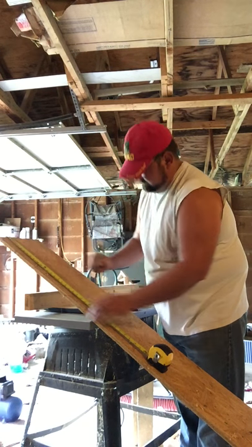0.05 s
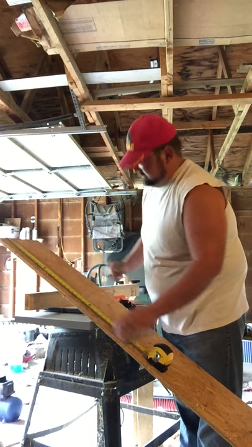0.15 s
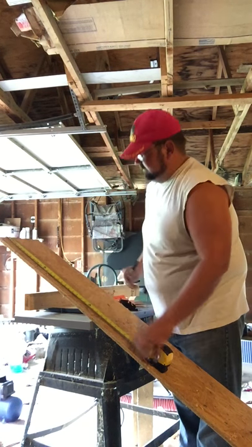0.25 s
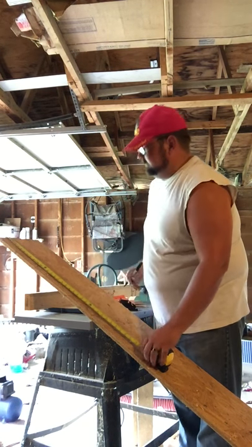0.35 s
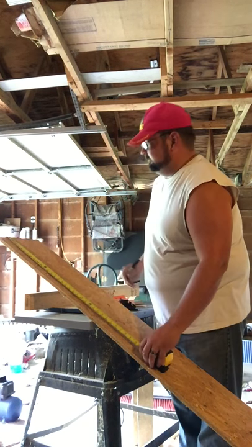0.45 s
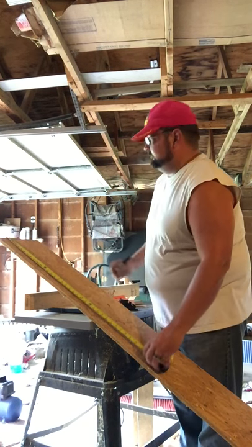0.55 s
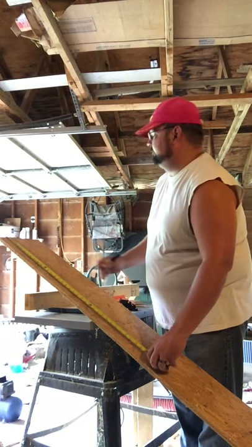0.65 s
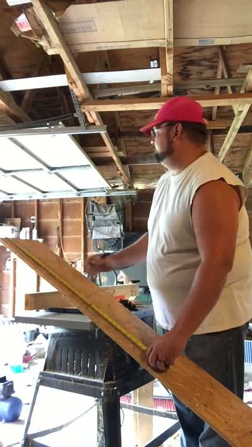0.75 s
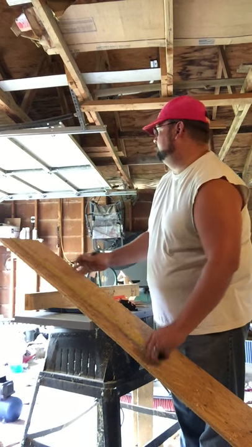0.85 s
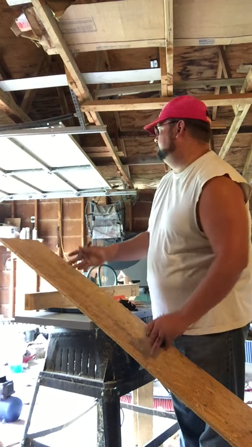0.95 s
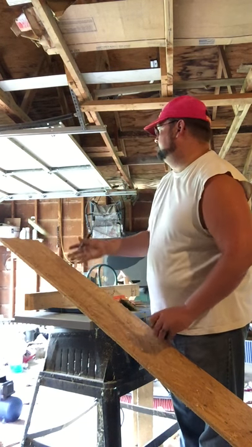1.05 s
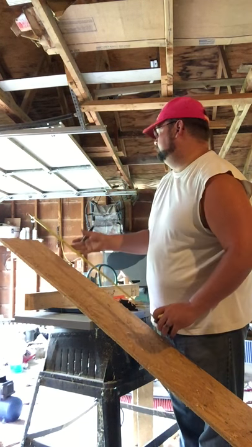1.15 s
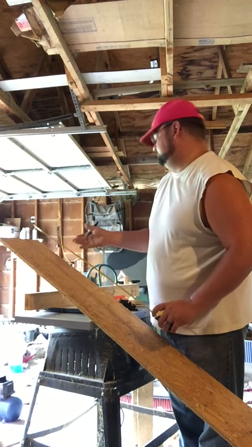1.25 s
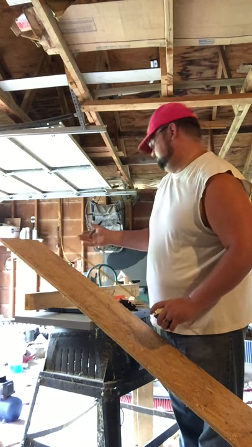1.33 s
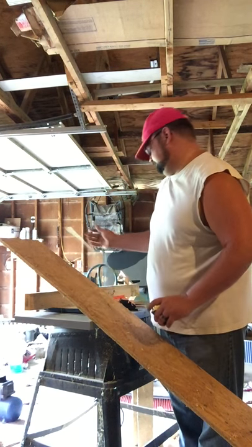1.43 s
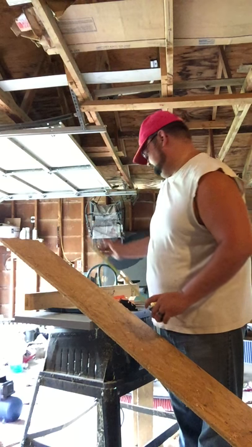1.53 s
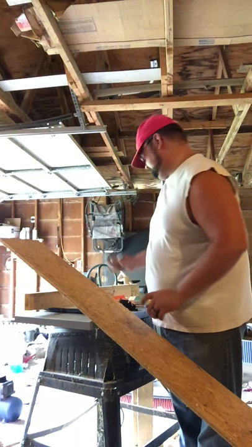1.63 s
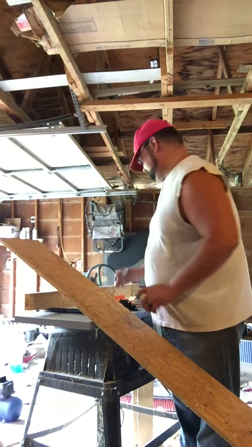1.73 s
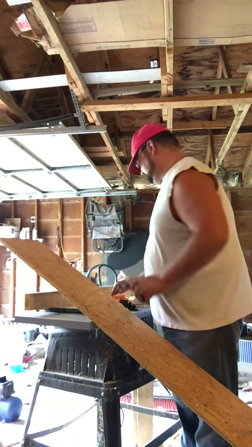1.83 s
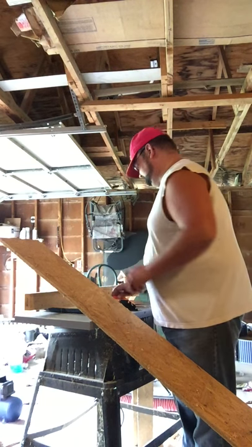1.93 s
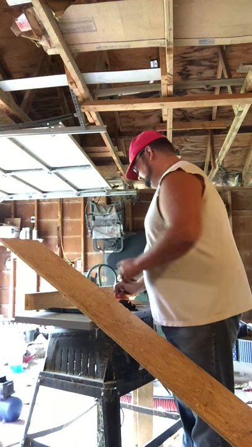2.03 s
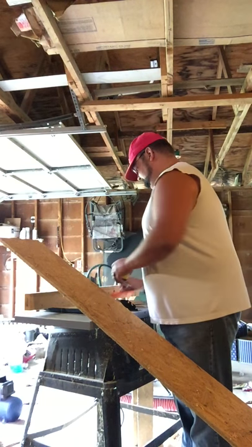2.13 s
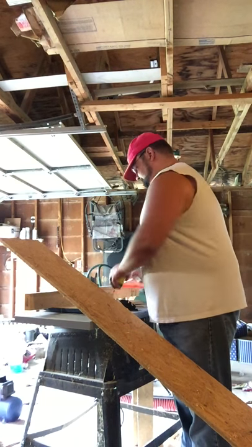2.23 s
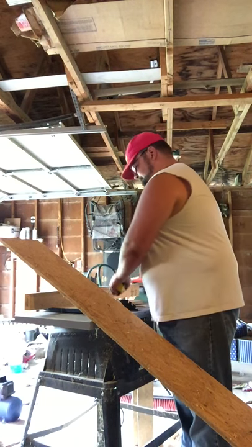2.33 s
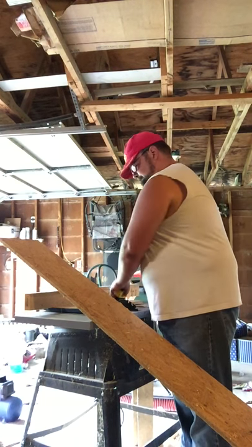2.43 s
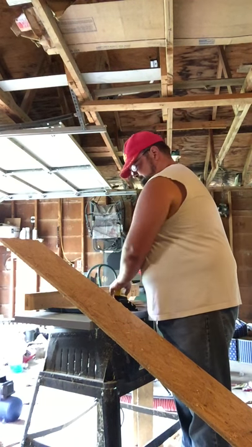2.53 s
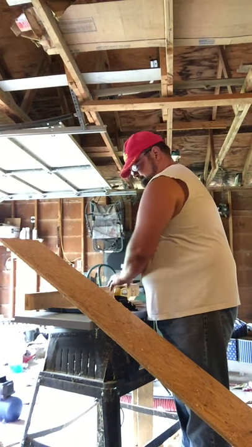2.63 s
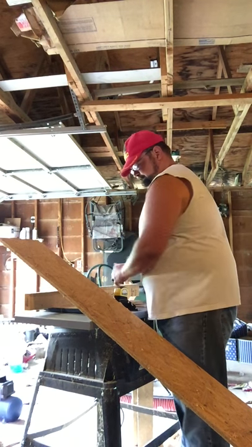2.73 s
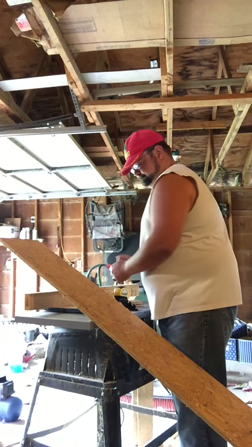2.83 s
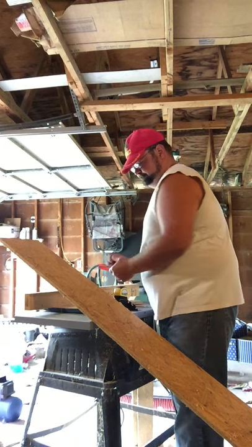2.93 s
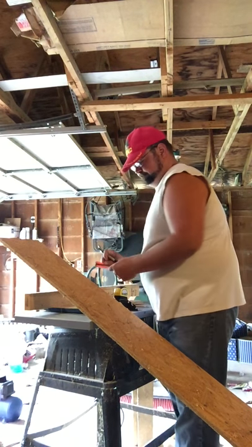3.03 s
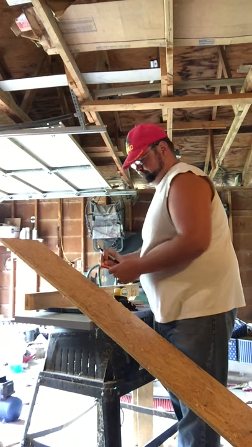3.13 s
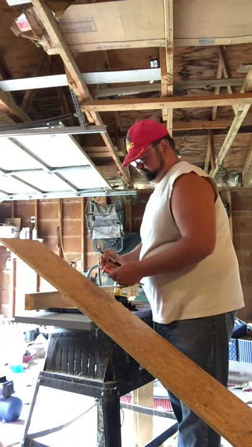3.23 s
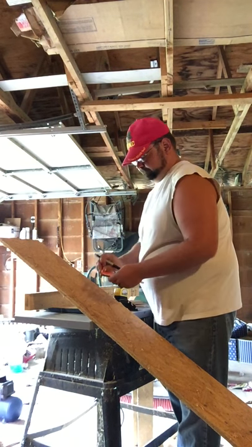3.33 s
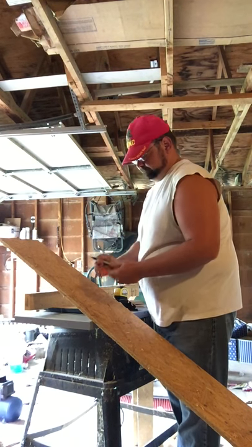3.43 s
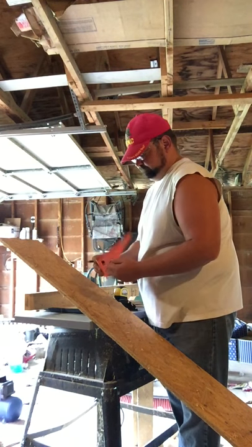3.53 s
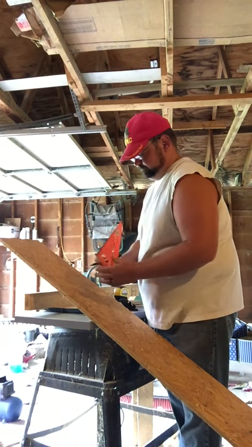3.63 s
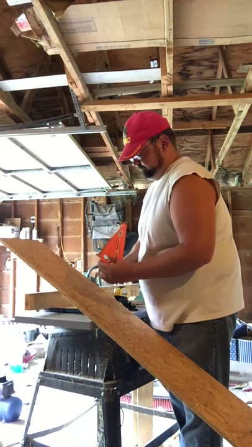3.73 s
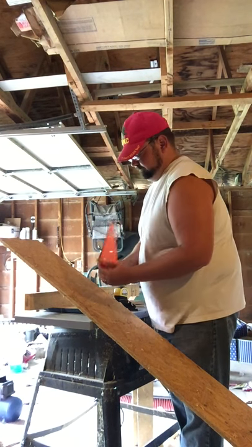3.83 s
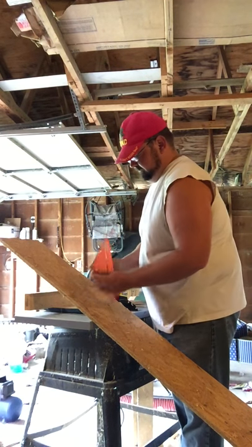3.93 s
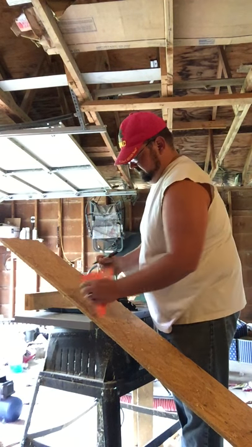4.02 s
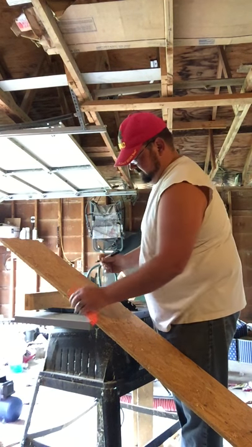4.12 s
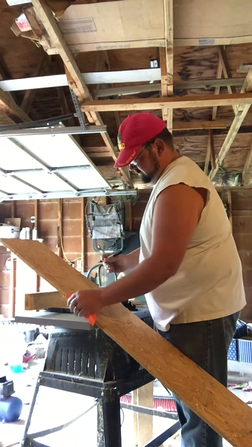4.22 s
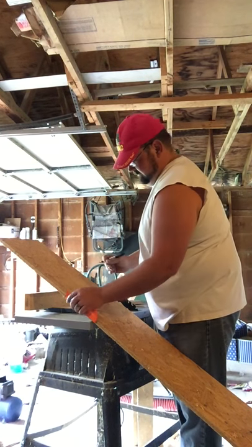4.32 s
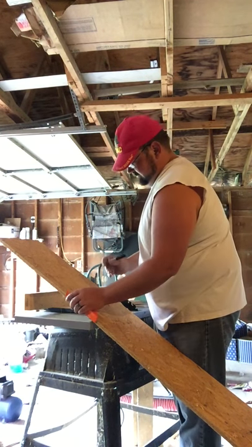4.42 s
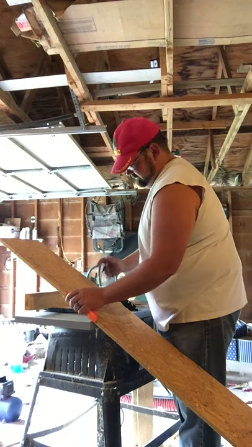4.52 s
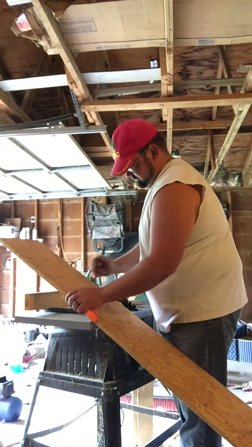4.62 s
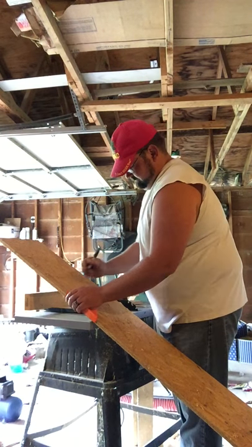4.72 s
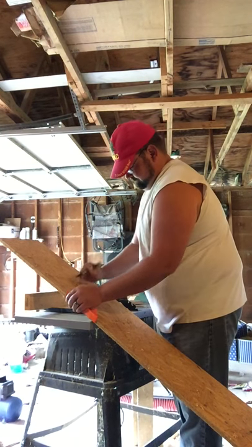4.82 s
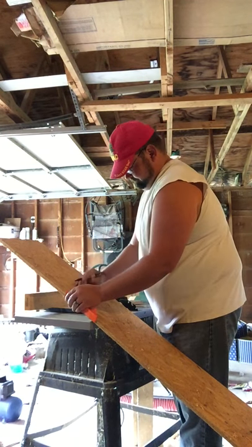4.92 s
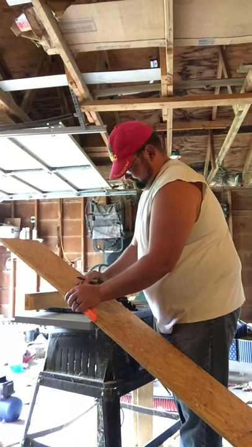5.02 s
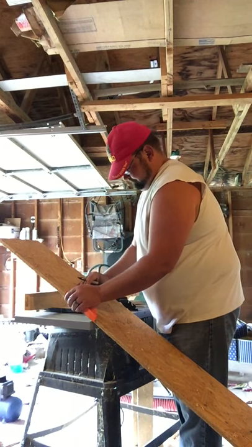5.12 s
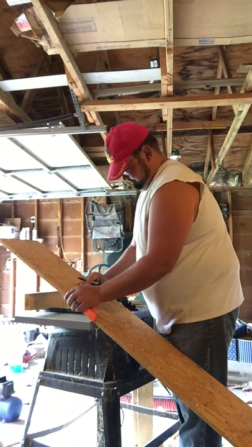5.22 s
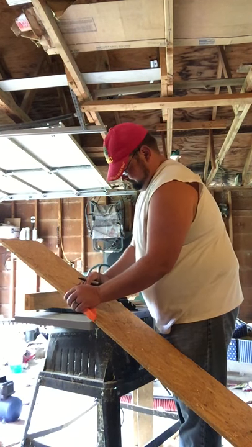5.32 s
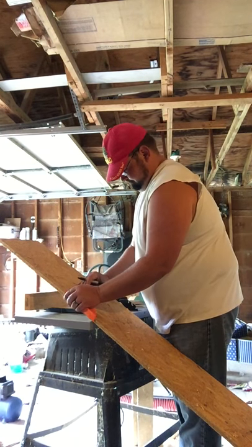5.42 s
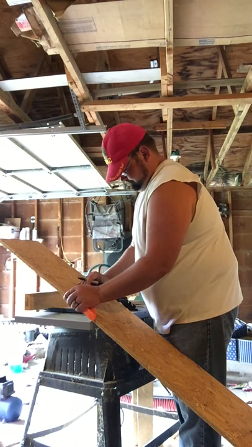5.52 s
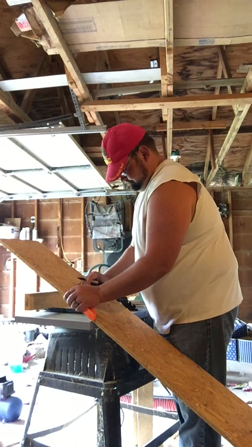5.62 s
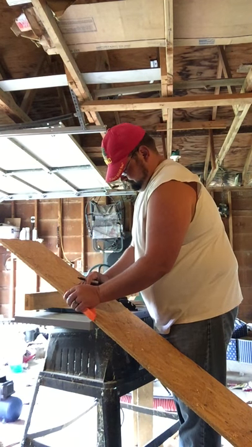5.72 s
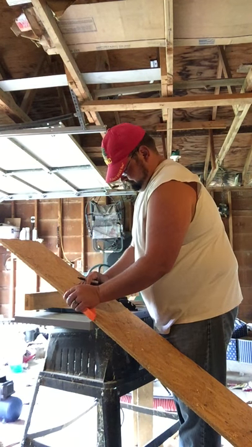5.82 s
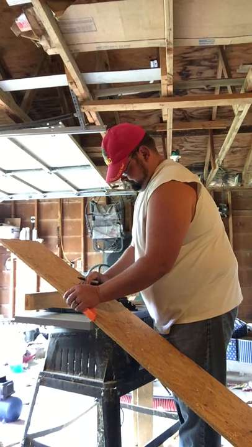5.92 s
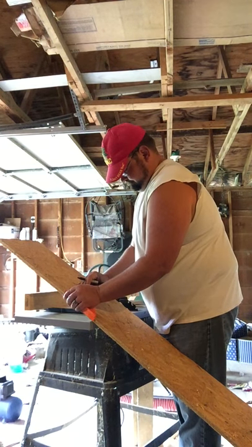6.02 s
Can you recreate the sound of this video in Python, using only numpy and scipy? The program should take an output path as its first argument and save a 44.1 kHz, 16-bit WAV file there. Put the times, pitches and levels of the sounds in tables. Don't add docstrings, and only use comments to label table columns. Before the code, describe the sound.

A steel tape measure scrapes, hisses back into its case and snaps hard, then tools knock and clatter on wood in an echoing garage.

```python
import sys
import numpy as np
from scipy import signal
from scipy.fft import rfft, irfft, next_fast_len
from scipy.io import wavfile
from scipy.ndimage import uniform_filter1d, map_coordinates

SR = 44100
rng = np.random.default_rng(int(sys.argv[2]) if len(sys.argv) > 2 else 0)


def level_to_linear(level):
    exponent = np.asarray(level, float) / 20
    return 10 ** exponent


def int16_out(signal):
    q = np.round(np.clip(np.atleast_2d(signal).T, -1, 1) * 32767)
    wavfile.write(sys.argv[1], SR, q.astype(np.int16))


N = 267290
TIME = np.arange(N) / SR


def unit(x):
    return x / np.sqrt(np.mean(x ** 2) + 1e-20)


def along(points, hz):
    f, value = np.transpose(points)
    return np.interp(np.log(hz + 1), np.log(f + 1), value)


def wobble(rate):
    knots = rng.standard_normal(int(N * rate / SR) + 4)
    return map_coordinates(knots, [np.arange(N) * rate / SR])


def swells(rows, rise, fall):
    levels = []
    for s, hold, db in rows:
        before = np.clip(s - TIME, 0, 9)
        after = np.clip(TIME - s - hold, 0, 9)
        levels.append(db - rise * before - fall * after)
    return level_to_linear(np.max(levels, axis=0))


def filtered(x, response):
    m = next_fast_len(len(x) + SR // 2)
    return irfft(rfft(x, m) * response(np.fft.rfftfreq(m, 1 / SR)), m)[:len(x)]


def coloured(points):
    return lambda f: level_to_linear(along(points, f))


def resonances(peaks):
    def response(f):
        total = 0
        for k, (centre, width, db) in enumerate(peaks):
            resonator = 1j * f * width / (centre * centre - f * f + 1j * f * width)
            total = total + (-1) ** k * level_to_linear(db) * resonator
        return total
    return response


def steep(peaks):
    return lambda f: resonances(peaks)(f) ** 2


def causal(gain):
    cepstrum = irfft(np.log(gain + 1e-6))
    cepstrum[1:len(cepstrum) // 2] *= 2
    cepstrum[len(cepstrum) // 2 + 1:] = 0
    return np.exp(rfft(cepstrum))


def grit(spiky_db, patchy_db):
    grains = rng.standard_normal(N) * level_to_linear(spiky_db * wobble(1200))
    z = signal.stft(grains, nperseg=256)[2]
    patches = uniform_filter1d(uniform_filter1d(rng.standard_normal(z.shape), 4, 0), 10, 1)
    return signal.istft(z * level_to_linear(patchy_db * unit(patches)), nperseg=256)[1][:N]


def ticks(rows):
    out, t = np.zeros(N), np.arange(SR // 5) / SR
    for s, db, hz, width_hz, t60 in rows:
        jolt = rng.standard_normal(len(t)) * level_to_linear(-60 * t / t60) * (1 - np.exp(-t / 0.0018))
        tick = filtered(jolt, steep([(hz, width_hz, 0)]))
        out[round(s * SR):][:len(t)] += level_to_linear(db) * tick / abs(tick).max()
    return out


# [f/Hz, t60/s]
GARAGE_DECAY = [(100, 0.57), (500, 0.42), (2000, .36), (5000, .3), (9000, 0.23), (15000, 0.33)]


def garage(x):
    hz, t, z = signal.stft(rng.standard_normal(SR // 2), SR, nperseg=256)
    lumps = uniform_filter1d(uniform_filter1d(rng.standard_normal(z.shape), 5, 0), 4, 1)
    decay_db = -60 * t / along(GARAGE_DECAY, hz)[:, None]
    tail = signal.istft(z * level_to_linear(3.2 * unit(lumps) + decay_db), SR, nperseg=256)[1]
    tail *= np.clip(np.arange(len(tail)) / SR / 0.004096, 0, 1)
    return signal.fftconvolve(x, tail / np.linalg.norm(tail))


def with_echo(x, room_db):
    return x + level_to_linear(room_db) * garage(x)[:N]


def narrow(hz, width_hz):
    return unit(filtered(rng.standard_normal(N), steep([(hz, width_hz, 0)])))


def unsteady_tone(hz, drift_hz, rate):
    return np.sin(2 * np.pi * np.cumsum(hz + drift_hz * wobble(rate)) / SR)


# [f/Hz, level/dB per Hz]
AIR_COLOUR = [(12, -47), (20, -16.5), (58, -7), (86, -1.5), (134, -8.5), (168, -8.5), (312, -11.5),
              (664, -20), (1010, -18.5), (2340, -19.5), (4590, -25), (4990, -29.5), (7390, -15.5),
              (9250, -34.5), (16200, -35)]


def air():
    return level_to_linear(-67) * unit(filtered(grit(spiky_db=-0.5, patchy_db=1.87), coloured(AIR_COLOUR)))


# [f/Hz, width/Hz, level/dB]
CHORUS_BANDS = [(5870, 470, -4), (7480, 550, -2.5), (9400, 420, -10)]
# [t/s, hold/s, level/dB]
LONE_SONGS = [
    (.42, .03, -84),
    (2.25, 0.57, -85.5),
    (5.45, .02, -87),
]


def insects():
    chorus = unit(filtered(grit(spiky_db=1.5, patchy_db=3), steep(CHORUS_BANDS)))
    shimmer_db = 1.2 * wobble(1.1) + .8 * wobble(28)
    singer = level_to_linear(-99) + swells(LONE_SONGS, rise=30, fall=130)
    return level_to_linear(-76 + shimmer_db) * chorus + singer * narrow(4650, 90)


# [t/s, hold/s, level/dB]
ENGINE_PASSES = [
    (1, .1, -83),
    (4.3, 0.18, -79.5),
    (5.45, .2, -78),
    (5.75, .1, -70.5),
    (5.95, .2, -65),
]
# [t/s, hold/s, level/dB]
ENGINE_REVS = [
    (3.75, .2, -75),
    (4.05, .12, -71),
    (4.58, .7, -66.5),
]


def engines():
    low = level_to_linear(-84) + swells(ENGINE_PASSES, rise=34, fall=60)
    upper = swells(ENGINE_REVS, rise=42, fall=95)
    low_note = 0.82 * narrow(94, 30) + 1.5 * unsteady_tone(93, 1.5, 3.6)
    upper_note = unsteady_tone(160, 0.93, 2.5) + .15 * narrow(150, 13)
    return low * low_note + upper * upper_note


def yard():
    return air() + insects() + engines()


# [f/Hz, level/dB per Hz]
CLOTH_COLOUR = [(88, -32), (150, -2), (535, -22), (578, -16.5), (2650, -15), (5610, -29), (7640, -38),
                (15000, -37)]
# [t/s, hold/s, level/dB]
HAND_MOVES = [
    (.1, .1, -73.5),
    (.3, 0.017, -84),
    (.39, 0.11, -67.5),
    (.55, 0.036, -81),
    (4.8, 0.018, -74),
    (5.05, .14, -72.5),
]


def rustle():
    cloth = unit(filtered(grit(spiky_db=1.5, patchy_db=-4.5), coloured(CLOTH_COLOUR)))
    return swells(HAND_MOVES, rise=193, fall=133) * cloth


SCUFF_EVENT = 4.3542, .008, -50.5
# [f/Hz, level/dB per Hz]
SCUFF_COLOUR = [(2000, -23), (3000, -3.5), (4500, -2), (7700, 3), (10000, -6.5), (15700, -19.5)]


def scuff():
    hiss = unit(filtered(grit(spiky_db=2.5, patchy_db=1.5), coloured(SCUFF_COLOUR)))
    return swells([SCUFF_EVENT], rise=9000, fall=330) * hiss


SQUEAK_EVENT = 4.134, .042, -68


def squeak():
    sag_hz = 1000 * np.clip(TIME - SQUEAK_EVENT[0], 0, .1)
    level = swells([SQUEAK_EVENT], rise=700, fall=900) * level_to_linear(2.5 * wobble(150))
    return level * np.sin(2 * np.pi * np.cumsum(1890 - sag_hz) / SR)


# [t/s, peak level/dB, f/Hz, width/Hz, t60/s]
HAND_TICKS = [(.92, -59.5, 147, 60, 0.11), (1.125, -50, 213, 80, 0.042), (.388, -58.5, 2700, 1500, 0.1),
              (.465, -57, 4970, 4000, 0.031), (2.116, -55.5, 200, 140, 0.029),
              (2.218, -58.5, 162.6, 79.5, 0.074), (2.296, -56.5, 2270, 418, 0.023),
              (3.111, -57, 474, 80.3, 0.045), (3.113, -56, 1370, 399, 0.12), (3.114, -60, 826, 200, 0.064),
              (3.139, -59, 3230, 2990, 0.17), (3.137, -70.5, 11700, 3016, 0.028),
              (3.53, -71, 11080, 1200, 0.05), (3.59, -53.5, 2160, 500, 0.04), (3.675, -56, 2150, 500, 0.03),
              (3.83, -69.5, 12600, 800, 0.042), (3.866, -61, 12240, 1000, 0.068),
              (3.868, -65.5, 14500, 2490, 0.053), (3.883, -54, 1550, 199.6, 0.033),
              (3.886, -56, 2400, 702, 0.032), (4.104, -54, 4270, 2500, 0.14), (4.104, -58, 894, 693, 0.15),
              (4.108, -71.5, 11950, 4000, 0.043), (4.8, -68.5, 11900, 4955, 0.54)]
# [t/s, peak level/dB, f/Hz, width/Hz, t60/s]
BENCH_AND_PLANK_RINGS = [(2.549, -35, 2900, 500, .04), (2.572, -32, 1102, 299, .04),
                         (2.593, -28.5, 960, 130, 0.06), (2.6, -41.5, 3214, 2498, 0.13),
                         (2.618, -40, 740, 120, 0.041), (2.645, -46, 1030, 300, .06),
                         (2.67, -51, 954, 300, .06), (2.668, -46.5, 2080, 401, 0.077),
                         (2.695, -52, 960, 199, .1), (2.72, -47.5, 756, 300, 0.06),
                         (2.748, -57, 1200, 400, 0.066), (2.77, -52, 790, 399, .07),
                         (2.81, -60, 1200, 500, .08), (4.19, -55, 2500, 2996, 0.22),
                         (4.209, -49, 3390, 594, .03), (4.25, -50, 1640, 150, 0.05),
                         (4.353, -48, 5500, 4995, 0.03), (4.29, -57, 114, 40, .2),
                         (4.3959, -37, 2900, 1800, .02), (4.409, -38, 1206, 202, 0.11),
                         (4.44, -55, 114, 29.8, 0.31), (4.466, -49, 1400, 298, .06),
                         (4.5, -64, 1090, 300, .06), (4.525, -55, 434, 250, 0.13)]


def hands():
    out = rustle() + scuff() + ticks(HAND_TICKS + BENCH_AND_PLANK_RINGS) + squeak()
    return with_echo(out, room_db=-8)


# [t/s, peak level/dB, f/Hz, width/Hz, t60/s]
LOOSE_KNOCKS = [(1.1215, -45, 4000, 5000, .03), (1.1245, -36, 13800, 4000, .012),
                (1.136, -51.5, 13500, 4000, .012), (1.811, -43.5, 2070, 600, .012),
                (1.811, -48, 6200, 900, .02), (1.8165, -41, 2070, 600, .012),
                (1.8165, -46, 6500, 2500, .012), (1.8165, -45, 15200, 900, .025),
                (1.821, -42, 2100, 600, .015), (1.825, -41.5, 3950, 600, .012),
                (1.829, -41, 3950, 600, .012), (1.85, -48, 9000, 9000, .01), (1.8635, -34, 9400, 1200, .01),
                (1.869, -24.5, 11500, 1500, 0.0048), (1.91, -38, 11800, 800, .012),
                (2.522, -42, 5900, 900, .02), (2.542, -43, 6794, 900, .012), (2.543, -39, 4600, 900, 0.069),
                (2.555, -29.5, 2200, 500, .05), (2.527, -33, 1500, 400, 0.044),
                (4.2255, -31, 2400, 1500, .02), (4.233, -40, 2500, 2200, 0.013),
                (4.285, -36, 3000, 3000, .015), (4.295, -27.5, 1380, 500, 0.034),
                (4.306, -52, 3620, 300, .03), (4.396, -50, 4050, 400, .02), (4.396, -38, 2000, 300, 0.018),
                (4.344, -53, 7000, 6000, .02), (2.56, -42, 347, 200, .2), (1.33, -53, 8900, 400, .2),
                (1.38, -58, 8900, 400, .2), (2.545, -51.5, 12010, 6000, .08), (2.02, -48.5, 2400, 120, .2)]


def rattle():
    return with_echo(ticks(LOOSE_KNOCKS), room_db=-8)


def struck(contacts, thing, ring_db, room_db):
    colour, modes = thing
    out = np.zeros(N + 2 * SR)
    t, hz = np.arange(8192) / SR, np.fft.rfftfreq(8192, 1 / SR)
    for s, db, t60, tilt_db, spot_hz in contacts:
        lean_db = lambda f: tilt_db * np.log2((f + 50) / 2000)
        chatter = rfft(rng.standard_normal(len(t)) * level_to_linear(-60 * t / t60) * (1 - np.exp(-t / 0.00059)))
        even = np.sqrt(uniform_filter1d(abs(chatter) ** 2, size=90))
        crack = irfft(chatter * causal(level_to_linear(along(colour, hz) + lean_db(hz)) / even))
        ring = np.zeros(len(t))
        for f, level, life in modes:
            mode_db = level + lean_db(f) + rng.normal(0, 2.3) - 60 * t / life
            ring += level_to_linear(mode_db) * np.sin(2 * np.pi * f * t)
        ring *= 1 - np.exp(-t / 0.00058)
        hit = crack / abs(crack).max() + level_to_linear(ring_db) * ring / len(modes) ** .5
        spot = level_to_linear(9.34 * np.exp(-(np.log((hz + 1) / spot_hz) / 0.093) ** 2))
        direct = irfft(rfft(hit) * causal(spot))
        heard = level_to_linear(room_db) * garage(hit)
        heard[:len(t)] += level_to_linear(-2.0) * direct
        out[round(s * SR):][:len(heard)] += level_to_linear(db) * heard
    return out[:N]


# [t/s, peak level/dB, chatter t60/s, brightness/dB per octave, favoured f/Hz]
PLANK_CONTACTS = [
    (4.281, -29, 0.039, 0.5, 1200),
    (4.2855, -20, 0.0061, 1.5, 1700),
    (4.294, -24.5, 0.02, 1.25, 870),
    (4.299, -23.5, 0.012, 0.5, 1310),
    (4.315, -32.5, 0.031, -2.5, 515),
    (4.329, -25.5, 0.0089, -6, 690),
    (4.396, -28, 0.0074, 2.5, 2730),
    (4.402, -30.5, 0.016, 1, 1160),
    (4.445, -34.5, 0.013, -3.5, 497),
    (4.577, -70, 0.036, 4, 534),
]
# [f/Hz, level/dB, t60/s]
PLANK_BODY = [(47, -54), (80, -33), (371, 0), (441, -9), (515, 1), (641, -15), (890, -10), (971, -14),
              (1720, -16), (1870, -17.5), (2280, -17.5), (3240, -30), (15000, -71.5)], [(256, -10, 0.17),
              (316, 3.5, 0.13), (420, -6, 0.36), (519, -1, 0.096), (702, 3, 0.15), (960, -4, 0.12),
              (1300, -2, 0.14)]


def plank_thud():
    return struck(PLANK_CONTACTS, PLANK_BODY, ring_db=-20.5, room_db=-2.5)


# [t/s, peak level/dB, chatter t60/s, brightness/dB per octave, favoured f/Hz]
SQUARE_CONTACTS = [
    (4.2128, -16.5, 0.019, 0.28, 3544),
    (4.2132, -19.5, 0.011, -0.4, 1650),
    (4.226, -23, 0.026, -1, 1400),
    (4.232, -28, 0.0053, -1, 594),
    (4.247, -32, 0.01, -1, 1000),
    (4.258, -29.5, 0.029, -1.2, 2220),
    (4.285, -35, 0.0059, 1, 2300),
]
# [f/Hz, level/dB, t60/s]
SQUARE_BODY = [(150, -34.5), (381, 4), (502, -7), (836, -10.5), (1170, 1), (1420, -7), (1650, 3.5),
               (1910, -14.5), (2320, -10), (3940, -6), (5000, -15), (9000, -20.5), (11500, -36),
               (16000, -51)], [(694, -13, 0.22), (1124, 1, 0.035), (1650, 5.5, 0.026), (2300, 4.5, 0.061),
               (2900, -2.5, 0.05), (3574, 2.5, 0.033), (4050, -5.5, 0.04), (4670, -11, 0.06)]


def square_slap():
    return struck(SQUARE_CONTACTS, SQUARE_BODY, ring_db=-4.5, room_db=-6.5)


# [t/s, peak level/dB, chatter t60/s, brightness/dB per octave, favoured f/Hz]
BENCH_CONTACTS = [
    (2.505, -54.5, 0.0298, 4.5, 694),
    (2.519, -26, 0.076, 1, 1891),
    (2.5235, -20, 0.035, 0, 1550),
    (2.5352, -9.5, 0.022, 1, 2130),
    (2.539, -16, 0.017, -2, 711),
    (2.546, -20, .012, 1.5, 1504),
    (2.557, -23, 0.011, 0.6, 2050),
    (2.57, -27.5, 0.026, 1.5, 1270),
    (2.594, -28.5, 0.014, -5, 960),
    (2.62, -37.5, 0.018, -3, 1150),
]
# [f/Hz, level/dB, t60/s]
BENCH_TOP_BODY = ([(75, -44.5), (126, -9.5), (160, -16.5), (195, -11), (290, -12), (494, -8), (566, -10),
                   (711, -1.5), (1200, -8), (2120, -8), (2660, -13), (3260, -17), (4480, -25),
                   (16000, -53)], [(132, -24, 0.081), (184, -6.5, 0.18), (482.4, 0, 0.12),
                   (690, 2.5, 0.067), (960, -1.5, 0.049), (1354, -4, 0.33), (1524, -4.5, 0.17),
                   (2173, 1, 0.11), (2900, -2, 0.058)])


def case_on_bench():
    return struck(BENCH_CONTACTS, BENCH_TOP_BODY, ring_db=-13, room_db=-6)


# [t/s, peak level/dB, chatter t60/s, brightness/dB per octave, favoured f/Hz]
HOOK_CONTACTS = [
    (1.1205, -35, .04, 1, 3500),
    (1.1247, -18.5, 0.0052, -1.5, 1224),
    (1.128, -28, .03, 1, 2500),
    (1.136, -38.5, .02, 2, 2540),
    (1.172, -42, 0.06, 0.5, 2680),
]
# [f/Hz, level/dB, t60/s]
HOOK_BODY = [(59, -30.5), (100, -22.5), (461, -16), (1360, -3), (1680, -7), (2080, -12), (2690, -4.5),
             (7610, -14), (9210, -24), (16000, -26.5)], [(1000, 5.5, 0.026), (1300, 4, 0.052),
             (1620, 1, 0.074), (2596, 4, 0.049), (3950, 10, 0.023)]


def unhook():
    return struck(HOOK_CONTACTS, HOOK_BODY, ring_db=-11.5, room_db=-5)


# [t/s, peak level/dB, chatter t60/s, brightness/dB per octave, favoured f/Hz]
CASE_CONTACTS = [
    (1.35, -48.5, .01, -0.96, 2600),
    (1.816, -45.5, .02, 0.9, 3900),
    (1.85, -38, 0.017, -0.87, 2500),
    (1.8635, -24, 0.014, 0.82, 4000),
    (1.8672, -10, 0.02, 1, 2300),
    (1.8698, -1.5, 0.0096, -0.63, 2400),
    (1.875, -12.5, .03, -0.23, 1880),
    (1.8815, -12.5, 0.014, -.5, 2900),
    (1.897, -22, 0.017, .5, 3450),
    (1.912, -24, 0.013, -0.35, 4180),
]
# [f/Hz, level/dB, t60/s]
CASE_BODY = [(24, -66), (40, -30.5), (97, -40.5), (300, -23.5), (417, -29.5), (640, -29.5), (910, -10),
             (1510, -11.5), (1880, -2), (2140, -9), (2410, -4), (2750, -6), (3300, -1.5), (3800, -7.5),
             (4230, -6.5), (12200, -20.5), (15300, -25.5), (16500, -38.5)], [(1891, -3.5, 0.21),
             (2400, -6.5, .15), (2990, -6, 0.098), (3360, -3.5, 0.17), (4238, 0, .08), (5560, -3.5, 0.083),
             (6100, 2.5, 0.087)]


def hook_snap():
    return struck(CASE_CONTACTS, CASE_BODY, ring_db=-19.5, room_db=-4)


# [t/s, hold/s, level/dB]
SPRING_SHUDDERS = [
    (2.072, 0.042, -58.5),
    (2.14, 0.043, -58),
    (2.205, .015, -71.5),
]
# [f/Hz, width/Hz, level/dB]
SPRING_BODY = [(250, 160, -1.5), (888, 490, 2.5), (1430, 1400, -1.5), (2370, 280, -1), (3310, 490, -6.5),
               (6000, 2500, -9)]


def spring_settles():
    shiver = level_to_linear(1.5 * wobble(55)) * grit(spiky_db=2, patchy_db=1.8)
    return swells(SPRING_SHUDDERS, rise=700, fall=500) * unit(filtered(shiver, steep(SPRING_BODY)))


# [f/Hz, width/Hz, level/dB]
BLADE_BODY = [(3080, 460, -4), (3629, 2000, 0.5), (4710, 1200, 5), (5700, 1100, 4), (7030, 1200, 3.5),
              (9000, 840, -2.5)]
# [f/Hz, level/dB per Hz]
FIZZ_COLOUR = [(5290, -26), (9000, -2), (10400, -8), (12200, -2.5), (14200, -6.5), (15700, -7)]


def blade_friction():
    grains = grit(spiky_db=3, patchy_db=2) * level_to_linear(0.06 * wobble(200))
    bend = 1 / (1 + np.exp(-2 * wobble(16)))
    straight = filtered(grains, resonances(BLADE_BODY))
    bent = filtered(grains, lambda f: resonances(BLADE_BODY)(f / .87))
    scrape = unit((1 - bend) * straight + bend * bent)
    fizz = unit(filtered(grit(spiky_db=3, patchy_db=1), coloured(FIZZ_COLOUR)))
    rub_body = resonances([(377, 200, -3), (1200, 1200, -2)])
    rub = unit(filtered(grit(spiky_db=1, patchy_db=1.36), rub_body))
    hum_body = resonances([(1700, 230, -3), (2400, 420, 4)])
    hum = unit(filtered(grit(spiky_db=0.5, patchy_db=2.5), hum_body))
    return bend, scrape, fizz, rub, hum


# [t/s, hold/s, level/dB]
DRAG_JERKS = [
    (0.813, 0.032, -55),
    (.888, 0.012, -63.5),
    (0.908, 0.006, -56.5),
    (0.922, .012, -55.5),
    (0.954, 0.03, -54.5),
    (0.993, 0.011, -54.5),
    (1.01, 0.0098, -62.5),
]
DRAG_MIX = -4.5, -14.5, -8
# [t/s, level/dB]
TEAR_CLICKS = [
    (.812, -51.5),
    (.888, -62.5),
    (.909, -62.5),
    (.922, -59),
    (.953, -55.5),
    (1.0, -66.5),
]
# [t/s, hold/s, level/dB]
CASE_NUDGES = [
    (.78, 0.027, -68),
    (1.105, 0.0075, -72.5),
]


def drag_off_plank(scrape, fizz, rub, hum):
    fizz_db, rub_db, hum_db = DRAG_MIX
    grip = 4000
    drag = swells(DRAG_JERKS, rise=grip, fall=323)
    starts = [(s, 0, db) for s, hold, db in DRAG_JERKS]
    fresh = np.minimum(drag, swells(starts, rise=grip, fall=207.5))
    out = drag * (scrape + level_to_linear(rub_db) * rub + level_to_linear(hum_db) * hum)
    out += fresh * level_to_linear(fizz_db) * fizz
    clicks = [(s, 0, db) for s, db in TEAR_CLICKS]
    out += swells(clicks, rise=20000, fall=2500) * (fizz + 0.56 * scrape)
    return out + swells(CASE_NUDGES, rise=280, fall=720) * rub


# [t/s, level/dB]
WIND_SPEED = [(1.16, -69.5), (1.24, -63), (1.33, -59), (1.354, -53), (1.425, -55.5), (1.47, -61),
              (1.555, -62.5), (1.635, -58), (1.8, -53), (1.845, -51), (1.89, -39)]
# [t/s, level/dB, thump beside it/dB]
BLADE_WHIPS = [
    (1.305, -52, -31),
    (1.585, -56.5, -36),
    (1.742, -45.5, -27.5),
    (1.818, -42.5, -12),
    (1.85, -48, -14),
    (1.862, -38, -7.5),
]
WIND_MIX = -2.5, -28.5, -14


def wind_in(bend, scrape, fizz, rub, hum):
    fizz_db, rub_db, hum_db = WIND_MIX
    s, speed_db = np.transpose(WIND_SPEED)
    surge_db = -0.33 * np.log(bend + .1)
    speed = level_to_linear(np.interp(TIME, s, speed_db) + surge_db)
    lash = swells([(s, 0, db) for s, db, thump_db in BLADE_WHIPS], rise=1100, fall=500)
    thump = swells([(s, 0, db + thump_db) for s, db, thump_db in BLADE_WHIPS], rise=1100, fall=500)
    wind = np.maximum(speed, lash)
    start, end = WIND_SPEED[0][0], WIND_SPEED[-1][0]
    filling_db = 13 * np.clip(TIME - start, 0, 1)
    running = np.clip(np.minimum(TIME - start, end - TIME) / 0.023, 0, 1)
    hiss = scrape + level_to_linear(fizz_db) * fizz + level_to_linear(hum_db + filling_db) * hum
    return running * (wind * hiss + (level_to_linear(rub_db) * speed + thump) * rub)


# [t/s, peak level/dB, f/Hz, width/Hz, t60/s]
BLADE_PINGS = [(.814, -55.5, 1760, 200, 0.25), (.815, -53, 2730, 500, 0.26), (.817, -67, 3960, 250, .06),
               (.826, -49, 8000, 500, 0.093), (.909, -51.5, 2280, 260, 0.18), (.92, -60, 6630, 395, .08),
               (.81, -57.5, 418, 204, 0.28), (.9, -62.5, 370, 204, 0.23), (1.2, -55, 90, 60, .15),
               (.955, -55.5, 1520, 600, 0.14), (.975, -60, 2100, 500, .1), (1.01, -51, 4170, 700, 0.13),
               (1.295, -49.5, 4470, 700, 0.058), (1.352, -50, 2400, 600, .15),
               (1.41, -51, 3870, 400, 0.095), (1.625, -54.5, 3600, 604, .08), (1.64, -53, 2400, 497.7, .2),
               (1.712, -50.5, 3600, 250, .1), (1.745, -50, 2400, 390, .1), (1.815, -46, 3850, 402, .05),
               (1.83, -46.5, 2170, 500, .08)]
# [t/s, peak level/dB, f/Hz, width/Hz, t60/s]
COIL_PINGS = [(1.869, -53.5, 90, 150, .04), (1.949, -55, 490, 200, 0.11), (2.003, -61, 447, 250, .1),
              (2.068, -49, 1040, 200.6, .08), (2.07, -48, 2350, 250, .07), (2.085, -53.5, 698, 119, 0.15),
              (2.1, -60, 1044, 149.7, .1), (2.115, -59, 2345, 119.5, 0.066), (2.132, -57, 3250, 298.4, .05),
              (2.135, -57.5, 845, 149, .1), (2.155, -55.5, 2372, 120, .06), (2.16, -55.5, 842, 149, .1),
              (2.165, -57, 1330, 149.8, .08), (2.172, -58.5, 2400, 199.4, .04),
              (2.195, -62, 900.6, 400, .06)]


def tape():
    bend, scrape, fizz, rub, hum = blade_friction()
    out = drag_off_plank(scrape, fizz, rub, hum)
    out += wind_in(bend, scrape, fizz, rub, hum)
    out += spring_settles()
    out += ticks(BLADE_PINGS + COIL_PINGS)
    return with_echo(out, room_db=-6.5)


def scene():
    background = yard() + hands() + rattle()
    hits = plank_thud() + square_slap() + case_on_bench() + unhook() + hook_snap()
    return (background + hits + tape())[None]


def top_cut(x):
    return signal.sosfilt(signal.butter(12, 16990, fs=SR, output="sos"), x)


def record(dry):
    top_hz = 15750
    low_cut = lambda hz: (1j * hz / (34 + 1j * hz)) ** 2
    kept = filtered(dry[0], lambda hz: low_cut(hz) * (hz < top_hz))
    top = filtered(dry[0], lambda hz: (hz >= top_hz) * (hz < 16800))
    power = uniform_filter1d(dry[0] ** 2, size=128)
    jump = power > 100 * np.roll(power, 400)
    attack = uniform_filter1d(1. * jump, size=256)
    return top_cut((kept + attack * top)[None])


dry = scene()
out = record(dry)
int16_out(out)
```